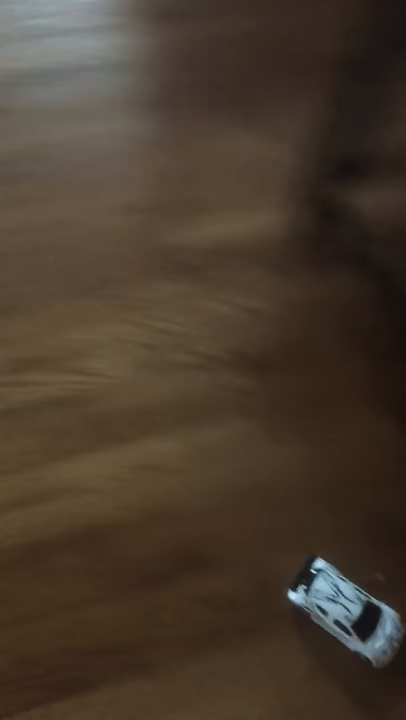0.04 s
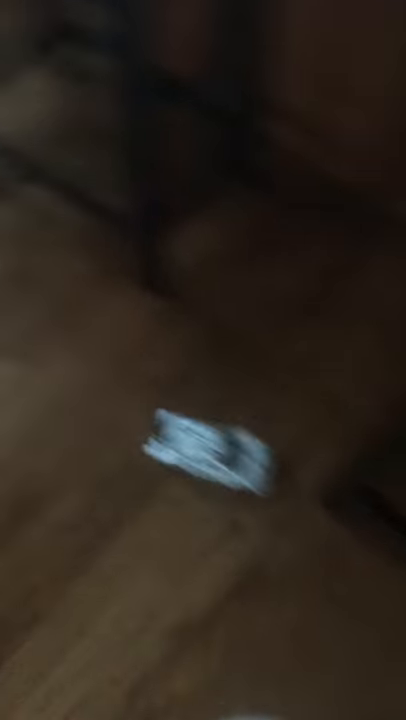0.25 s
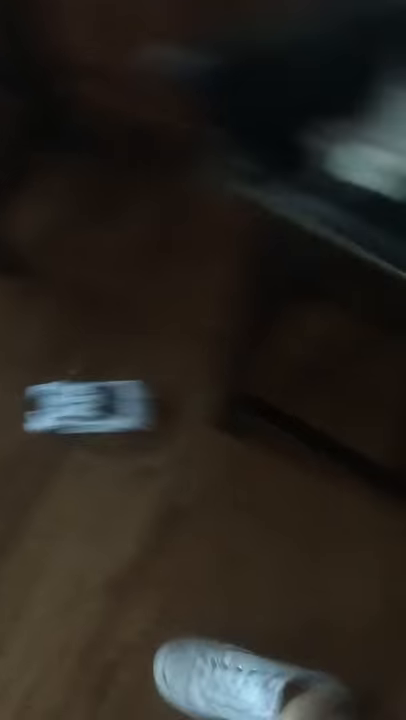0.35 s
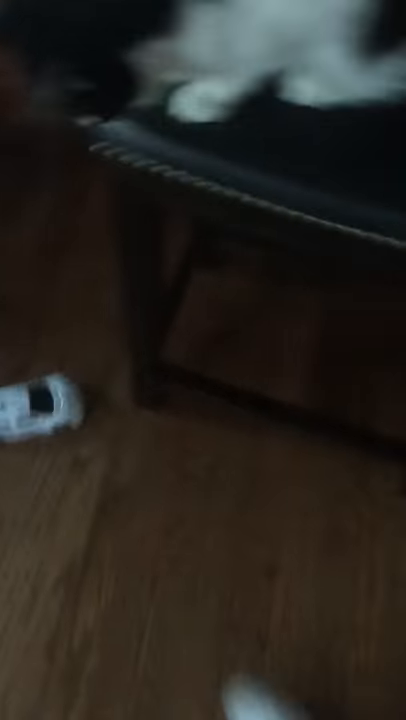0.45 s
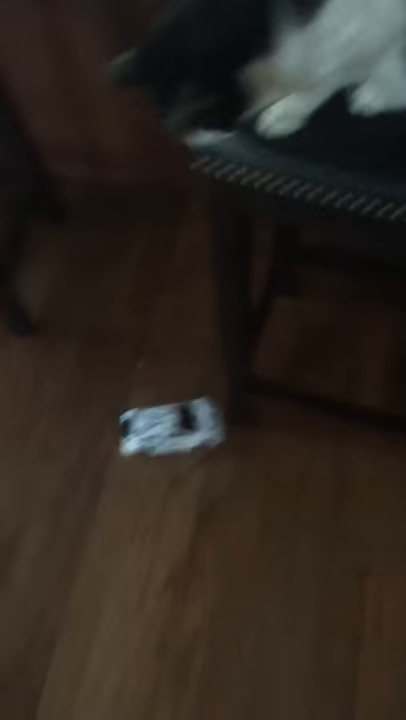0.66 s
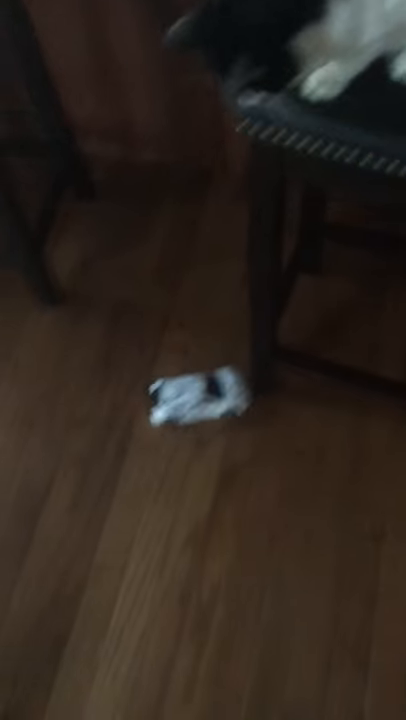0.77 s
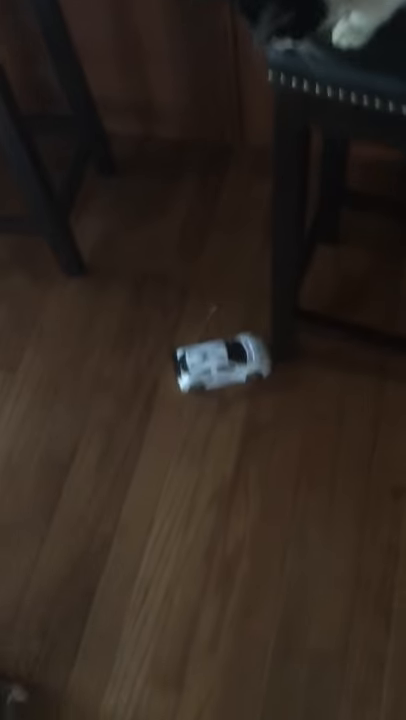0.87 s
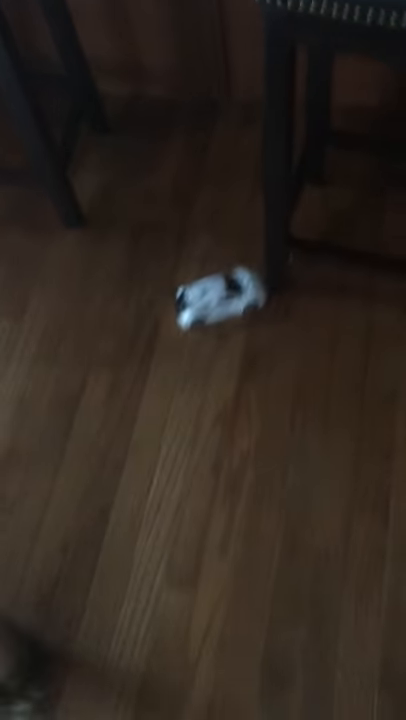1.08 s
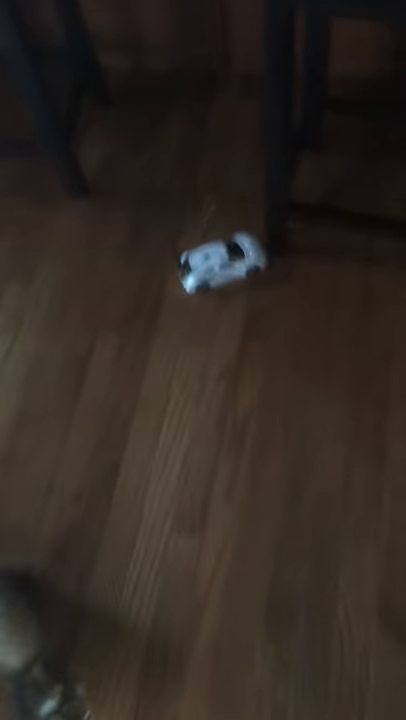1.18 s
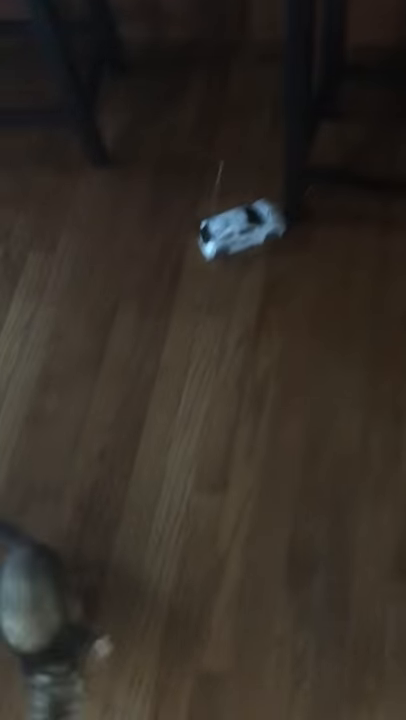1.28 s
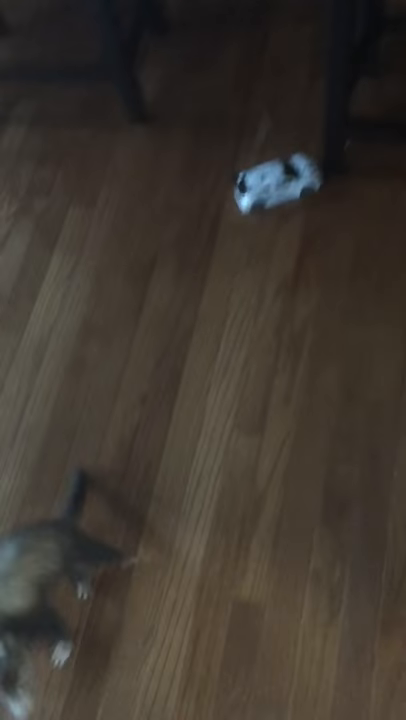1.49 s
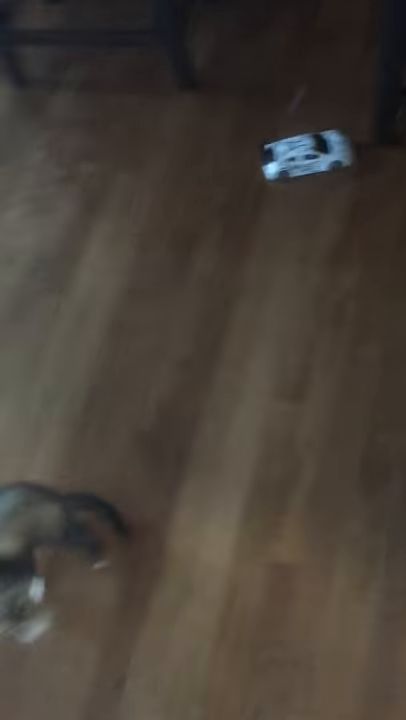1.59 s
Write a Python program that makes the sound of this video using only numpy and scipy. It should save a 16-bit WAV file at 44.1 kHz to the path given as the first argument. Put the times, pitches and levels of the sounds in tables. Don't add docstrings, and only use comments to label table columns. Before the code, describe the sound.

Toy car with buzzing gears runs across floorboards indoors, bumps twice, then fades to faint rattling

```python
import sys
import numpy as np
from scipy import signal
from scipy.io import wavfile

SR = 44100
rng = np.random.default_rng(int(sys.argv[2]) if len(sys.argv) > 2 else 0)


def transcribe(u):
    v = np.clip(np.atleast_2d(u).T, -1, 1)
    q = np.round(v * 32767).astype(np.int16)
    wavfile.write(sys.argv[1], SR, q)


def to_linear_factor(level_db):
    exponent = np.asarray(level_db, float) / 20
    return 10 ** exponent


N = 72765

# time in seconds, level in dB, nearness as treble in dB, gear whine pitch in Hz.
DRIVE = [(0.001, -31, 0, 1060), (.1, -36, 3, 1000), (.135, -28, -5, 1000), (.2, -28, -5, 1010),
         (.33, -31, -5, 965), (.47, -43, -4, 960), (.58, -41, -8, 1040), (.7, -40, -5, 1090),
         (.9, -43, -6, 1050), (1.035, -47, -5, 1050), (1.07, -39, -7, 1080), (1.21, -43, -8, 1040),
         (1.34, -62, -6, 1050), (1.515, -60, -6, 1060), (1.527, -41, -16, 1060), (1.565, -49, -10, 1040),
         (1.578, -36, -12, 1020), (1.65, -38, -6, 1010)]
# pitch in Hz, width in Hz, level in dB.
SHELL = [(880, 80, -9), (975, 50, 0), (1085, 60, -1), (1290, 90, -10), (1580, 80, -8), (1810, 90, -13),
         (2200, 150, -11), (2700, 150, -10), (3240, 150, -15), (4250, 250, -18), (5900, 400, -22)]
# pitch in Hz, level in dB per Hz.
TYRE_HISS = [(300, -7.5), (700, -8.5), (1300, 0.2), (2700, -6), (5000, -12), (9000, -19), (15000, -29.5)]
# time in seconds, peak in dB, boom of the boards in dB,
# length of the clatter in seconds, treble tilt in dB per octave.
KNOCKS = [
    (0.2106, -8, -7.5, 0.011, 1.5),
    (0.3072, -16.5, -27, 0.016, 0.95),
    (0.3464, -33, -6, 0.013, 4),
    (0.649, -50, -3.5, 0.01, 3.5),
    (0.7025, -41, -31, 0.027, -1),
    (0.7284, -19.5, -9, 0.017, 1.94),
    (0.85, -32.5, -37, 0.033, -2),
    (1.1962, -44.5, -10, 0.01, -2),
    (1.3029, -50.5, 3, 0.014, -3),
    (1.5768, -67.5, -25, 0.022, 7),
]
# pitch in Hz, level in dB per Hz.
CRACK = [(300, -3.5), (600, -2.5), (1500, 2.1), (3000, -4.5), (5000, -8.5), (9000, -15.5), (15000, -23)]
# pitch in Hz, level in dB, time to fall 60 dB in seconds.
BOARDS = [(78.7, -1.5, 0.16), (124.9, -4, 0.22), (156, 4, 0.18), (205.8, 5.5, 0.13), (252.2, 10, 0.1),
          (290, -19, 0.45), (335, -10.5, 0.17), (534, -9.5, 0.076)]
# time in seconds, peak in dB.
CLAW_TAP = [(1.4, -26)]
# pitch in Hz, level in dB, time to fall 60 dB in seconds.
TAP_MODES = [(1000, -9, .015), (1550, -12, .012), (2250, -3, .012), (2550, -5, .012), (3050, -7, .01),
             (4300, -13, .008), (7100, -21, .008)]
# time in seconds, peak in dB, low modes over high modes in dB.
TINKLES = [(0.9994, -85, 0.1), (1.0583, -51.5, -0.5), (1.0744, -75, 0.1), (1.2369, -57.5, 12.5),
           (1.2544, -92, 0.1), (1.283, -55, 4), (1.3114, -55, 5.5), (1.3386, -51, -7.5),
           (1.4683, -62.5, 8.5), (1.5229, -57.5, 0), (1.5525, -61, 5), (1.5975, -51, 5.5)]
# pitch in Hz, level in dB, time to fall 60 dB in seconds.
BELL = [(4200, 8, .07), (4500, -4, .05), (6350, -6, .04), (10200, 0.1, .07), (10900, -5, .06)]
# pitch in Hz, time to fall 60 dB in seconds.
ROOM = [(100, 0.8), (300, 0.53), (1000, .55), (4000, 0.7), (12000, 0.26)]
# pitch in Hz, level in dB.
RUMBLE = [(30, -14), (60, -6), (140, -2), (300, -8.5), (500, -17), (1200, -19), (3000, -52), (9000, -46.5)]

TEETH_PER_S, TOOTH_SPREAD_DB, WOBBLE_DB, GEAR_DB = 1800, 2, 1, -2
HISS_DB, GRIT_FLUTTER_DB = 2, 1.2
TREBLE_LOSS = 0.63
ROLL_HZ, ROLL_WIDTH_HZ, ROLL_DB = 72.3, 28, -6.5
WHINE_DB, WHINE_WANDER_HZ, WHINE_FLUTTER_DB = -4, 20, 3
CLATTER_PER_S, CRACK_DB, SHELL_RING_DB = 3200, 1.5, -9
KNOCK_RISE_S, KNOCK_DAMPING = .0011, 3
LOWS_LINGER = .3
BOOM_DELAY_S, BOOM_RISE_S = 0.01, 0.013
ROOM_DB, ROOM_GAP_S = -7.5, 0.002
RUMBLE_DB, LUMPY_DB = -45, 1.8
PADDING_S, PADDING_LENGTH_S, PADDING_DB = 1.38, .17, 4
MIC_LOW_HZ, CUTOFF_HZ = 51, 15600


def rms_one(x):
    return x / np.sqrt(np.mean(x ** 2) + 1e-20)


def at_hz(points, hz):
    table = np.array(points)
    return np.interp(np.log(hz), np.log(table[:, 0]), table[:, 1])


def drift(rate):
    r = np.exp(-80 * np.pi * rate / SR)
    noise = rng.standard_normal(N // 40 + 2002)
    slow = signal.lfilter([1], [1, -2 * r, r * r], noise)[2000:]
    return np.interp(np.arange(N) / 40, np.arange(len(slow)), rms_one(slow))


def bands(x):
    edges = 24 * 2 ** np.arange(0, 9.6, .5)
    for k, (low, high) in enumerate(zip(edges, edges[1:])):
        sos = signal.butter(2, [low, high], "band", fs=SR, output="sos")
        yield np.sqrt(low * high), (-1) ** k * signal.sosfilt(sos, x + 1e-18)


def coloured_bands(x, colour):
    parts = [(hz, to_linear_factor(at_hz(colour, hz)) * band) for hz, band in bands(x) if hz > 250]
    spread = np.std(sum(band for _, band in parts))
    return [(hz, band / spread) for hz, band in parts]


def ring(x, hz, t60):
    r = to_linear_factor(-60 / (t60 * SR))
    w = 2 * np.pi * hz / SR
    return signal.lfilter([0, np.sin(w)], [1, -2 * r * np.cos(w), r * r], x + 1e-18)


def grains(per_s, spread_db):
    sizes = to_linear_factor(spread_db * np.minimum(rng.exponential(1, N), 4)) * rng.choice([-1, 1], N)
    return rms_one(sizes * (rng.random(N) < per_s / SR))


def shell(x, treble, damping):
    out = 0
    for k, (hz, width, db) in enumerate(SHELL):
        gain = (-1) ** k * to_linear_factor(db) * (treble if hz > 1400 else 1)
        out = out + gain * ring(x, hz, 2 / width / damping) * np.sqrt(width / SR)
    return out


def gears():
    s, db, near_db, mesh_hz = np.transpose(DRIVE)
    t = np.arange(N) / SR
    level, near_db = to_linear_factor(np.interp(t, s, db)), np.interp(t, s, near_db)

    teeth = grains(TEETH_PER_S, TOOTH_SPREAD_DB) * to_linear_factor(WOBBLE_DB * drift(25))
    body = shell(level * teeth, to_linear_factor(near_db), 1) / np.std(shell(teeth, 1, 1))

    dust = grains(6000, 2) * to_linear_factor(GRIT_FLUTTER_DB * drift(30))
    grit = 0
    for hz, band in coloured_bands(dust, TYRE_HISS):
        grit = grit + band * to_linear_factor(near_db * (1 + TREBLE_LOSS * max(np.log2(hz / 2500), 0)))

    roll = rms_one(ring(rng.standard_normal(N), ROLL_HZ, 2 / ROLL_WIDTH_HZ)) * to_linear_factor(ROLL_DB + near_db)

    pitch = np.interp(t, s, mesh_hz) + WHINE_WANDER_HZ * drift(40)
    whine_level = to_linear_factor(WHINE_DB + WHINE_FLUTTER_DB * drift(35))
    whine = np.sin(2 * np.pi * np.cumsum(pitch) / SR) * whine_level
    return to_linear_factor(GEAR_DB) * body + level * (to_linear_factor(HISS_DB) * grit + roll + whine)


def knocks():
    t = np.arange(N) / SR
    s, db, boom_db, length, tilt_db = np.transpose(KNOCKS)[:, :, None]
    since = np.maximum(t - s + .001, 0)

    def bursts(hz):
        fade = np.exp(-(since / (length * (2500 / hz) ** LOWS_LINGER)) ** 2)
        rise = 1 - np.exp(-since / KNOCK_RISE_S)
        peak = to_linear_factor(db + tilt_db * max(np.log2(hz / 2500), 0))
        return (peak * rise * fade).sum(axis=0)

    clatter = grains(CLATTER_PER_S, 1.77)
    crack = sum(band * bursts(hz) for hz, band in coloured_bands(clatter, CRACK))
    body = shell(bursts(1200) * clatter, 1, KNOCK_DAMPING) / np.std(shell(clatter, 1, KNOCK_DAMPING))

    shove = np.sin(np.pi * np.clip((t - s - BOOM_DELAY_S) / BOOM_RISE_S, 0, 1)) ** 2 * to_linear_factor(db + boom_db)
    luck = to_linear_factor(2 * rng.normal(0, 1, (len(s), len(BOARDS))))
    pushes = luck.T @ shove
    boom = 0
    for k, ((hz, mode_db, t60), push) in enumerate(zip(BOARDS, pushes)):
        drive = push * np.sin(2 * np.pi * hz * t + k * k)
        boom = boom + to_linear_factor(mode_db) * ring(drive, hz, t60)
    return to_linear_factor(CRACK_DB) * crack + to_linear_factor(SHELL_RING_DB) * body + boom * 4 / (BOOM_RISE_S * SR)


def tap():
    (s, db), = CLAW_TAP
    times = s + np.array([.0008, .0024, .0047])
    clicks = np.zeros(N)
    clicks[(times * SR).astype(int)] = to_linear_factor(db + np.array([-5, -3, -2.5])) * [1, -1, 1]
    soft = signal.lfilter([.5], [1, -.5], clicks)
    return sum(to_linear_factor(level_db) * ring(soft, hz, t60) for hz, level_db, t60 in TAP_MODES)


def bell():
    s, db, low_db = np.transpose(TINKLES)
    luck_db = rng.normal(0, 2.5, (len(s), len(BELL)))
    out = 0
    for (hz, level_db, t60), row_db in zip(BELL, luck_db.T):
        clicks = np.zeros(N)
        clicks[(s * SR).astype(int)] = to_linear_factor(db + level_db + row_db + low_db * (hz < 8000) - 8.0)
        out = out + ring(clicks, hz, t60)
    return out


def room(x):
    t = np.arange(N) / SR
    tail = sum(band * to_linear_factor(-60 * t / at_hz(ROOM, hz)) for hz, band in bands(rng.standard_normal(N)))
    tail = tail * np.clip(t / ROOM_GAP_S - 1, 0, 1)
    return to_linear_factor(ROOM_DB) * signal.fftconvolve(x, tail / np.sqrt(np.sum(tail ** 2)))[:N]


def rumble():
    t = np.arange(N) / SR
    swell_db = PADDING_DB * np.exp(-((t - PADDING_S) / PADDING_LENGTH_S) ** 2)
    out = 0
    for hz, band in bands(rng.standard_normal(N)):
        moving_db = (swell_db + LUMPY_DB * drift(6)) * (hz < 400)
        out = out + to_linear_factor(at_hz(RUMBLE, hz) + moving_db) * band
    return to_linear_factor(RUMBLE_DB) * rms_one(out)


def scene():
    struck = knocks() + bell() + tap()
    return (struck + room(struck) + gears() + rumble())[None]


def top_cut(x):
    return signal.sosfilt(signal.butter(12, 16500, fs=SR, output="sos"), x)


def record(dry):
    x = signal.sosfilt(signal.butter(4, MIC_LOW_HZ, "high", fs=SR, output="sos"), dry)
    x = 1.2 * np.tanh(x / 1.2)
    x = signal.sosfilt(signal.butter(10, CUTOFF_HZ, fs=SR, output="sos"), x)
    return top_cut(x)


dry = scene()
out = record(dry)
transcribe(out)
```